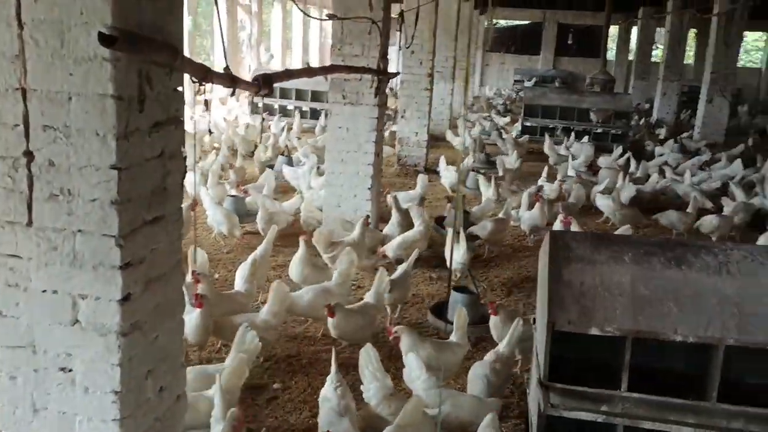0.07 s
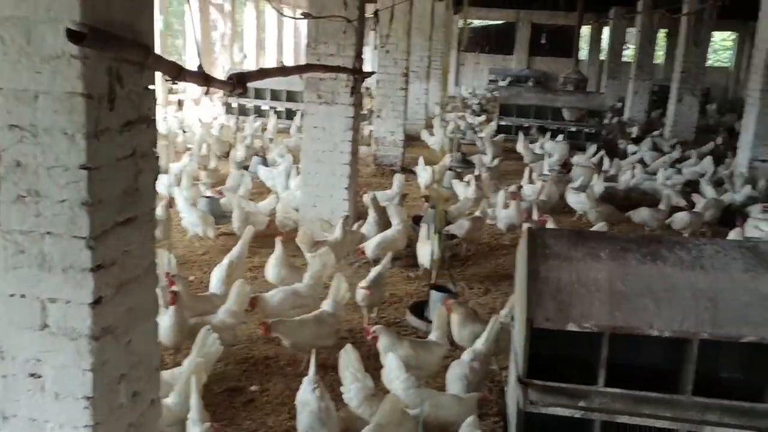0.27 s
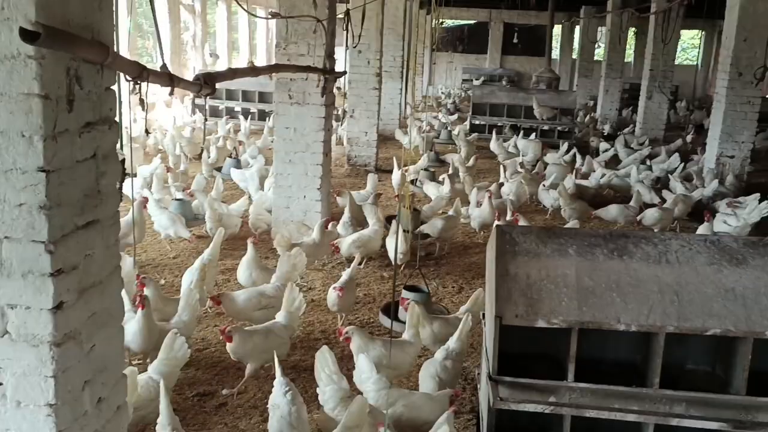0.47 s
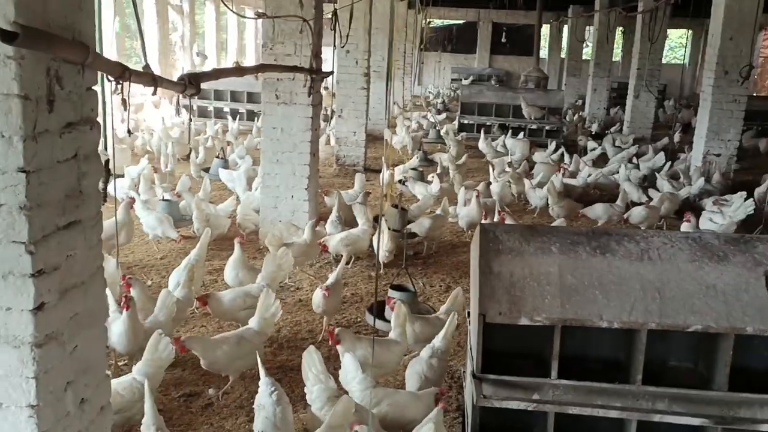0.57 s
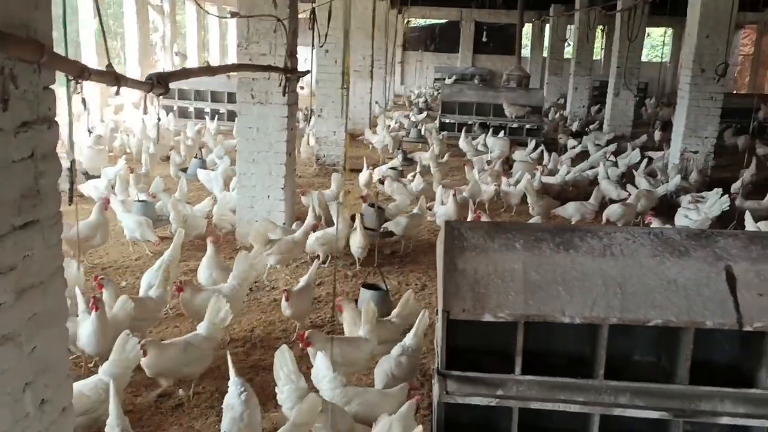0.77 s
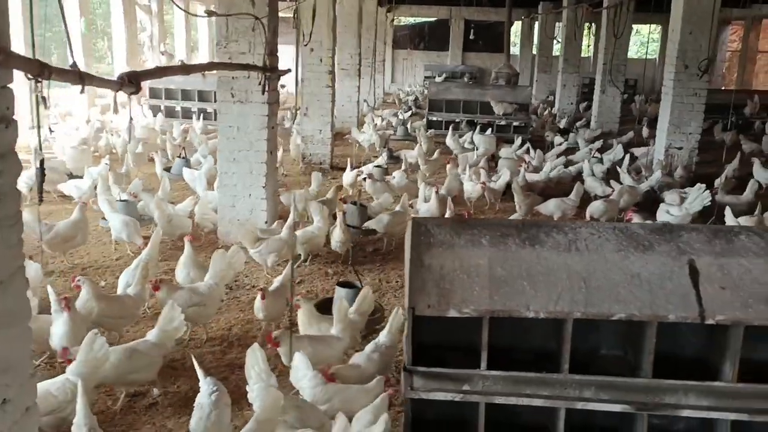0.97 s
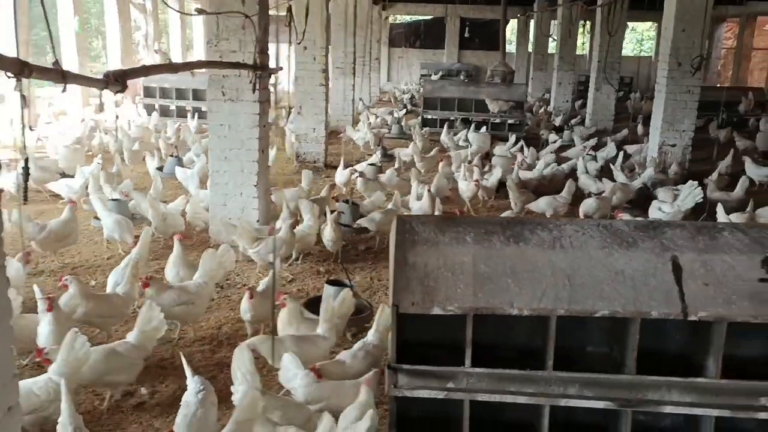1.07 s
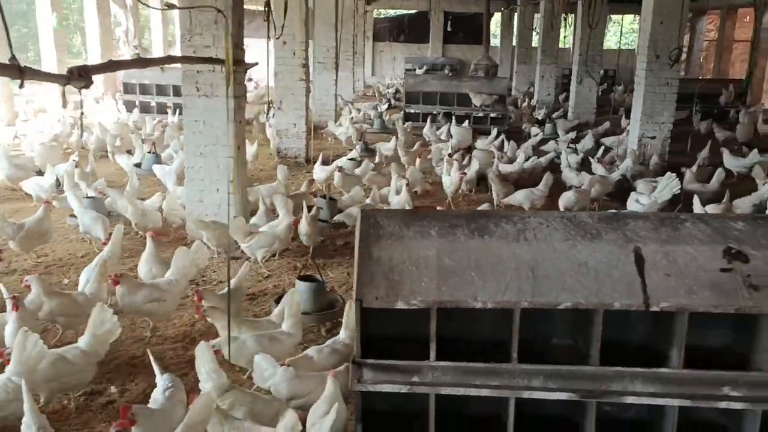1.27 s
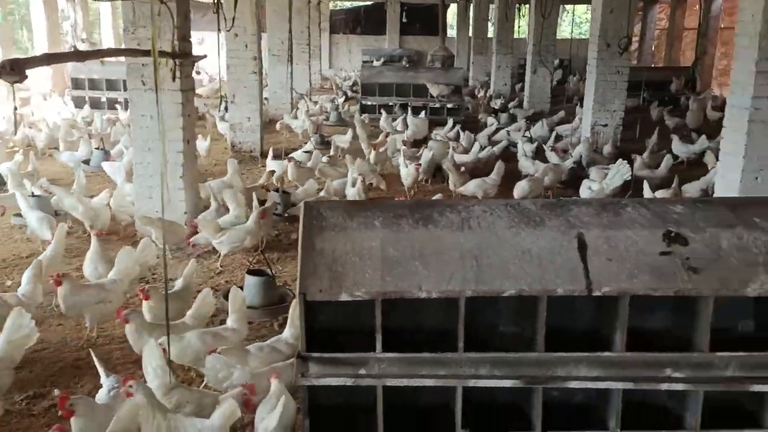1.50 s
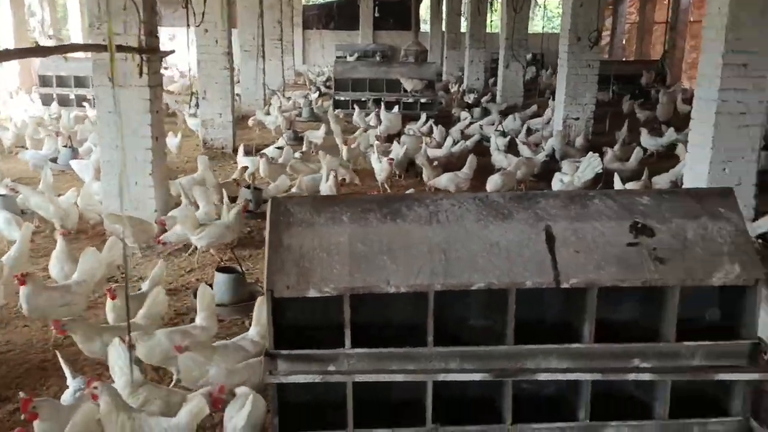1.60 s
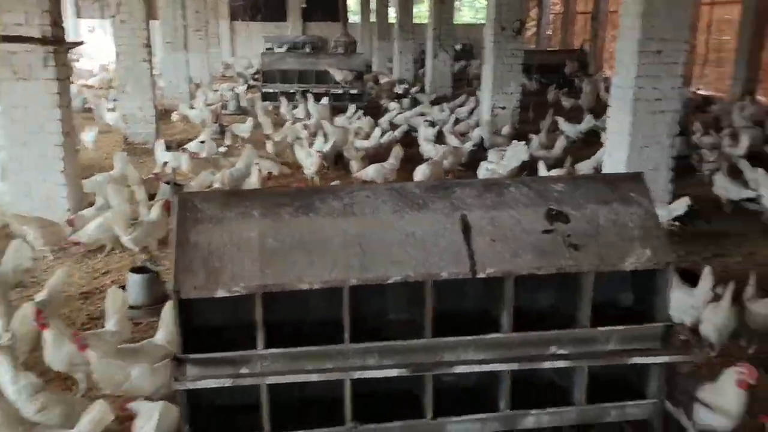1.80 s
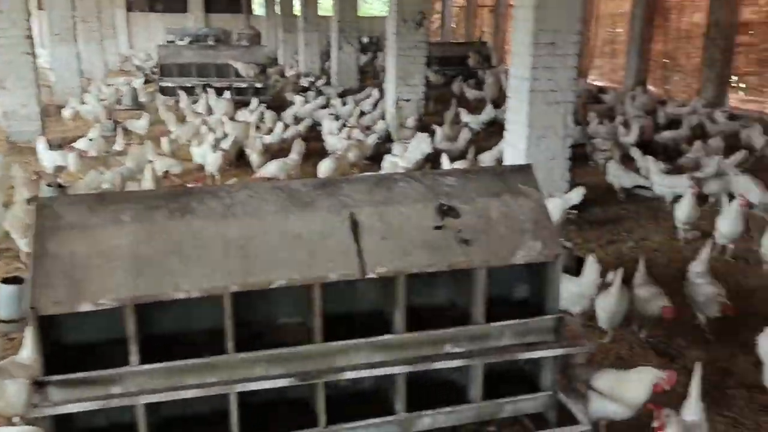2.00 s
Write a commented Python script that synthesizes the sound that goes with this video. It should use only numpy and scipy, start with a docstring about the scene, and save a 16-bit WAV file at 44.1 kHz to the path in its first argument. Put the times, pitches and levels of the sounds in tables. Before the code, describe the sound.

Hens cluck softly throughout, with a short echo from the farm shed. Early on, a nearby hen shrieks and squawks harshly; then more distant birds make long rasping calls while a few brief clucks sound near the microphone.

```python
"""A murmuring flock of hens, and close to the microphones one hen shrieks, then breaks into a squawk.
Long rasping growls follow from farther back, among short clucks and thin calls. The shriek is almost
a pure tone; the squawk and calls are harmonics and breath shaped by a throat; the growls are slow
snaps that ring it. Heard on a stereo pair in an open brick shed, which gives the voices a short tail."""
import sys
import numpy as np
from scipy import signal
from scipy.fft import rfft, irfft, next_fast_len
from scipy.io import wavfile

SR = 44100
rng = np.random.default_rng(int(sys.argv[2]) if len(sys.argv) > 2 else 0)


def dump(signal):
    """Clip the signal to [-1, 1] and save it as 16-bit WAV at the path in sys.argv[1]."""
    limited = np.clip(np.atleast_2d(signal).T, -1, 1)
    pcm = np.round(limited * 32767).astype(np.int16)
    wavfile.write(sys.argv[1], SR, pcm)


N = 90404

# The near hen's shriek. Each row: time in seconds, pitch in Hz, level in dB.
SHRIEK_PATH = [(.229, 1340, -45), (.236, 1392, -20), (.256, 1415, -21.5), (.298, 1502, -16.5),
               (.342, 1478, -19.5), (.362, 1398, -21.5), (.385, 1240, -37)]
# Its partials. Each row: multiple of the pitch, level in dB.
SHRIEK_HARMONICS = [(1, 0), (2, -23), (3, -24), (4, -30), (6, -47)]
# Her squawk. Each row: time in seconds, pitch in Hz, level in dB, roughness from 0 to 1,
# gain of the half-pitch lines in dB.
SQUAWK_PATH = [(.378, 590, -30, .3, -30), (.396, 560, -24, .15, -25), (.412, 615, -16, .15, -14),
               (.446, 595, -21, .35, -14), (.47, 590, -21, .65, -3), (.51, 550, -20.5, .55, 2),
               (.578, 536, -23, .22, 5), (.615, 552, -25.5, .06, 2), (.647, 597, -18, .02, -6),
               (.708, 570, -21, .06, -24), (.745, 520, -33, .4, -13)]
# Her throat. Each row: frequency in Hz, gain in dB.
SQUAWK_THROAT = [(300, -39), (580, -17), (850, -11), (1200, 4), (1400, 2.5), (1650, -8.5), (2200, -6),
                 (2850, -11), (3400, -20.5), (4130, -14), (4720, -23), (5400, -38.5), (6800, -38),
                 (8000, -34.5), (11000, -47.5), (15500, -75)]
# The flat hiss that ends her squawk. Each row: frequency in Hz, gain in dB.
HISS_SPECTRUM = [(3000, 0), (15000, 0)]
# Growls, farther back. Each row: start and length in seconds, relative level in dB, rise and fall
# in seconds, factor on the throat's frequencies, lag at the left microphone in samples.
FAR_GROWLS = [(-.1, 0.19, -35, .03, 0.12, 0.9, 7.3), (0.788, 0.31, -31, 0.072, 0.026, 0.95, 19),
              (1.072, 0.3, -33, 0.0072, 0.13, 0.95, 19), (1.43, 0.33, -31.5, 0.0029, 0.011, 0.99, 10.5)]
# A growling throat. Each row: frequency in Hz, gain in dB.
GROWL_FORMANTS = [(500, -53), (730, -4.5), (890, -5.5), (1030, -9), (1280, 3), (1480, 0), (1750, -14.5),
                  (2500, -14), (3600, -14.5), (4400, -27), (5400, -29.5), (6400, -57), (8000, -31),
                  (11300, -52.5), (15500, -61.5)]
# Clucks close by. Each row: start and length in seconds, pitch in Hz, level in dB,
# roughness from 0 to 1, left over right in dB.
NEAR_CLUCKS = [(-.03, 0.061, 565, -32, 0.2, -1.5), (0.98, 0.041, 594, -25.5, 0.61, 2.5),
               (1.016, 0.031, 599.7, -25, 0.25, 7.5), (1.756, 0.032, 495.2, -25, 0.4, 2.5),
               (2.02, 0.073, 612, -38.5, 0.1, -3)]
# A clucking throat. Each row: frequency in Hz, gain in dB.
CLUCK_FORMANTS = [(300, -43), (570, -2), (1000, 13), (1300, 4.5), (1850, 10), (2500, -4), (3500, -10),
                  (4400, -13), (6300, -31.5), (8200, -38), (15500, -71.5)]
# Pops of a voice close by. Each row: start in seconds, level in dB.
NEAR_POPS = [(1.439, -22), (1.977, -27.5)]
# Thin calls from far off. Each row: start and length in seconds, pitch in Hz, relative level in dB.
THIN_CALLS = [(0.148, 0.13, 442, -42.5), (.785, 0.045, 437, -37.5), (1.038, 0.384, 662.3, -39),
              (1.35, 0.098, 441, -38), (1.455, 0.286, 439.9, -35.5), (1.545, 0.1, 401, -39.5),
              (1.955, 0.12, 642.7, -46.5)]
# Those callers' throats. Each row: frequency in Hz, gain in dB.
THIN_FORMANTS = [(480, -46.5), (660, -22.5), (880, 27), (1050, -1.5), (1320, -2.5), (1750, -26),
                 (2600, -36), (3650, -12), (4600, -28.5), (6000, -46), (15000, -84)]
# The colour of the flock's murmur. Each row: frequency in Hz, gain in dB.
MURMUR_SPECTRUM = [(500, -34.5), (720, -19.5), (900, 1), (1050, -17), (1310, 2.5), (1480, -7), (1750, -31),
                   (2700, -34), (3800, -29), (4600, -54), (6200, -57), (8000, -42), (11000, -56),
                   (15500, -84.5)]
# Its rise and fall. Each row: time in seconds, level in dB.
MURMUR_LEVEL = [(0, -28), (0.126, -45), (0.222, -28.5), (0.499, -27), (0.778, -31.5), (1.37, -36.5),
                (1.6, -36.5), (2.05, -36)]
# Soft bumps on the left, perhaps hens jostling. Each row: start in seconds, level in dB.
LEFT_BUMPS = [(0.589, -52.5), (1.407, -57), (1.979, -58.5)]
# Their dull body. Each row: frequency in Hz, gain in dB.
BUMP_SPECTRUM = [(110, -31), (200, -9.5), (320, -0.5), (470, -16.5), (1200, -56.5)]
# Low rumble and shuffling in the shed. Each row: frequency in Hz, gain in dB.
RUMBLE_SPECTRUM = [(25, -46), (52, -14), (65, -10.5), (83, -1.5), (105, -20), (300, -9.5), (480, -23),
                   (900, -62.5)]
# The ring of the shed. Each row: frequency in Hz, seconds for the tail to fall 60 dB.
SHED_DECAY = [(200, 0.095), (1200, 0.28), (4000, 0.17), (12000, 0.077)]
# The mismatch of the microphones. Each row: frequency in Hz, left over right in dB.
PAIR_BALANCE = [(700, 0), (1300, 0.5), (2400, 4.5), (4400, 1.5), (8000, -1.5), (14000, 19)]

BAND_LIMIT_HZ = 15700
NEAR_LOW_CUT_HZ, FAR_LOW_CUT_HZ = 507, 645  # the voices, near and far, are cut steeply below these


def shriek(jitter=0.0057, flutter_db=5.0, ring_hz=4480, ring_width_hz=80, ring_db=10):
    """A nearly pure high note arches and drops; one overtone swells as it crosses a resonance."""
    hz, db = controls(SHRIEK_PATH)
    n = len(hz)
    phase = 2 * np.pi * np.cumsum(hz * (1 + jitter * wander(n, 700))) / SR
    tone = np.zeros(n)
    for k, partial_db in SHRIEK_HARMONICS:
        resonance = ring_db / (1 + ((k * hz - ring_hz) / ring_width_hz) ** 2)
        flutter = flutter_db * (k > 1) * wander(n, 67)
        tone += amp(partial_db + resonance + flutter) * np.sin(k * phase)
    breath = amp(-15.5) * colour(rng.standard_normal(n), SQUAWK_THROAT)
    return amp(db) * (evened(tone) + breath)


def squawk(rattle_db=4, rattle_hz=220):
    """The near hen's voice breaks down into a rasp, doubles its period, then clears."""
    hz, db, rough, half_db = controls(SQUAWK_PATH)
    rattle = rattle_db * rough * wander(len(hz), rattle_hz)
    envelope = amp(db + rattle) * signal.windows.tukey(len(hz), .05)
    return envelope * voice(hz, rough, SQUAWK_THROAT, half_db, jitter=0.0042)


def voice(hz, rough, throat, half_db=-60, jitter=.005, count=48):
    """Wavering harmonics, half-pitch lines and a puff of air per cycle pass through a throat."""
    n, block = len(hz), 64
    waver = (jitter + .06 * rough) * wander(n, 259.08)
    phase = 2 * np.pi * np.cumsum(hz * (1 + waver)) / SR
    phase += np.pi * .008 * wander(n, 1500)  # uneven cycles blur the top harmonics
    k = np.arange(1, count + 1)[:, None]  # even k: harmonics; odd k: half-pitch lines
    line_hz = k * hz[::block] / 2
    line_db = read(throat, line_hz) + (k % 2) * (half_db * np.ones(n))[::block]
    gains = np.repeat(amp(line_db) * (line_hz < BAND_LIMIT_HZ), block, axis=1)[:, :n]
    tone = (gains * np.cos(k * phase / 2 + rng.uniform(0, np.pi, (count, 1)))).sum(0)
    air = colour((1 + np.cos(phase)) * rng.standard_normal(n), throat)
    return ((1 - rough) * evened(tone) + rough * air) / np.hypot(1 - rough, rough)


def growl(length, db, rise, fall, formant_scale, snaps_per_s=94, puff_s=0.0049):
    """Slow uneven snaps, each with a puff of air, ring the throat."""
    t = np.arange(0, length, 1 / SR)
    cycles = np.cumsum(snaps_per_s * np.exp(.35 * wander(len(t), 120))) / SR
    snaps = np.diff(np.floor(cycles), prepend=0)
    puffs = 0.23 + np.exp(-(cycles % 1) / snaps_per_s / puff_s)
    air = puffs * amp(3 * wander(len(t), 85.36)) * rng.standard_normal(len(t))
    envelope = np.clip(np.minimum(t / rise, (length - t) / fall), 0, 1)
    rasp = colour(evened(air) + 0.59 * evened(snaps), GROWL_FORMANTS, formant_scale)
    return amp(db) * envelope * rasp


def call(length, hz, db, rough, throat, arch=0.032, count=48, fade_s=0.012):
    """A cluck or a longer call: one voiced note with a small arch of pitch."""
    t = np.arange(0, length, 1 / SR)
    pitch = hz * (1 + arch * (np.sin(np.pi * t / length) - 2 / np.pi))
    envelope = np.clip(np.minimum(t, length - t) / fade_s, 0, 1)
    return amp(db) * envelope * voice(pitch, rough, throat, count=count)


def pop(db, hz=1324, length_s=0.0154):
    """One puff rings the main resonance of a throat."""
    t = np.arange(0, length_s, 1 / SR)
    return amp(db) * np.sin(np.pi * t / length_s) ** 2 * np.sin(2 * np.pi * hz * t)


def flock(calls_per_s=45, spread_db=3, blur_db=-5):
    """Many distant hens call at random, left and right, over the blur of the rest."""
    calls = np.zeros((2, N))
    for i, (when, length, pitch, loud, side) in enumerate(rng.random((128, 5))):
        start = (i + when) / calls_per_s - .1
        if start < N / SR:
            note = call(0.038 + 0.1457 * length, 300 + 380 * pitch, spread_db * (2 * loud - 1),
                        rough=0.11, throat=MURMUR_SPECTRUM, count=28)
            add(calls, start, place(note, side_db=7 * (2 * side - 1)))
    blur = np.array([colour(noise, MURMUR_SPECTRUM) for noise in rng.standard_normal((2, N))])
    blur = blur + 0.36 * blur[::-1]  # each microphone hears some of the other side
    level = amp(np.interp(np.arange(N) / SR, *np.transpose(MURMUR_LEVEL)))
    echoing_calls = evened(calls + 1.51 * shed(calls))
    return level * evened(echoing_calls + amp(blur_db) * blur)


def swell(db, rise_s, spectrum):
    """A hiss or a soft bump: coloured noise rises and dies away."""
    age = np.arange(0, 10 * rise_s, 1 / SR) / rise_s
    return amp(db) * age * np.exp(1 - age) * colour(rng.standard_normal(len(age)), spectrum)


def rumble():
    """Faint low noise in the shed, part of it common to both microphones."""
    common, left, right = [colour(noise, RUMBLE_SPECTRUM) for noise in rng.standard_normal((3, N))]
    return amp(-65) * (place(common, side_db=5.5) + np.array([left, right]))


def shed(x, reflections_per_s=2500):
    """Sparse reflections of random sign come off the brick, each band dying at its own speed."""
    taps = rng.choice([-1., 1.], (2, SR // 2)) * (rng.random((2, SR // 2)) < reflections_per_s / SR)
    taps[:, :130] = 0  # about 3 ms before the first reflection
    hz, t, bands = signal.stft(taps, SR, nperseg=256)
    decay = amp(-60 * t / read(SHED_DECAY, hz)[:, None])
    early_lift = 1 + 3.2 * np.exp(-t / 0.052)
    tail = signal.istft(bands * decay * early_lift, SR, nperseg=256)[1]
    tail /= np.linalg.norm(tail, axis=1, keepdims=True)
    return signal.fftconvolve(x, tail, axes=1)[:, :N]


def brighten(x, db_per_octave=7.5):
    """Treble reaches the microphones mostly by way of the walls: a tilt from 1.5 to 6 kHz."""
    octaves = np.log2(np.clip(np.fft.rfftfreq(N, 1 / SR) / 1500, 1, 4))
    return irfft(rfft(x) * amp(db_per_octave * octaves), N)


def amp(db):
    """Decibels to gain."""
    return 10 ** (np.asarray(db) / 20)


def evened(x):
    """Scales to an rms of one."""
    return x / np.sqrt(np.mean(x ** 2) + 1e-20)


def read(points, hz):
    """Reads a curve on a log-frequency axis."""
    f, value = np.transpose(points)
    return np.interp(np.log(hz + 1), np.log(f + 1), value)


def controls(table):
    """One curve for each column after the time, from the first row to the last."""
    times, *columns = np.transpose(table)
    t = np.arange(times[0], times[-1], 1 / SR)
    return [np.interp(t, times, column) for column in columns]


def colour(x, spectrum, scale=1):
    """Filters by a spectrum, its frequencies times scale; the result has an rms of one."""
    n = next_fast_len(len(x) + 2048)
    gain = amp(read(spectrum, np.fft.rfftfreq(n, 1 / SR) / scale))
    return evened(irfft(rfft(x, n) * gain, n)[:len(x)])


def wander(n, rate_hz):
    """Smooth random motion."""
    return np.interp(np.arange(n) * rate_hz / SR, np.arange(4096), rng.standard_normal(4096))


def low_cut(x, hz):
    """A steep high-pass."""
    return signal.sosfilt(signal.butter(6, hz, "high", fs=SR, output="sos"), x)


def place(x, side_db=0, lag=0):
    """Onto the pair: the left microphone is side_db louder and lag samples later."""
    samples = np.arange(len(x))
    left = np.interp(samples - lag, samples, x)
    return np.array([left * amp(side_db / 2), x * amp(-side_db / 2)])


def add(mix, start_s, sound):
    """Mixes a stereo sound in, trimming what falls outside."""
    at = round(start_s * SR)
    sound = sound[:, max(-at, 0):]
    part = mix[:, max(at, 0):][:, :sound.shape[1]]
    part += sound[:, :part.shape[1]]


def scene():
    """Near hens, farther hens and the flock under one roof."""
    near, far, bumps = np.zeros((3, 2, N))
    add(near, SHRIEK_PATH[0][0], place(shriek(), lag=6))
    add(near, SQUAWK_PATH[0][0], place(squawk(), lag=7))
    for start, *row, lag in FAR_GROWLS:
        add(far, start, place(growl(*row), lag=lag))
    for start, *row, side_db in NEAR_CLUCKS:
        add(near, start, place(call(*row, CLUCK_FORMANTS), side_db, lag=13.1))
    for start, *row in THIN_CALLS:
        add(far, start, place(call(*row, rough=0.18, throat=THIN_FORMANTS, arch=0.012)))
    add(near, .704, place(swell(db=-53, rise_s=0.0078, spectrum=HISS_SPECTRUM)))
    for start, db in NEAR_POPS:
        add(near, start, place(pop(db)))
    for start, db in LEFT_BUMPS:
        add(bumps, start, place(swell(db, rise_s=0.033, spectrum=BUMP_SPECTRUM), side_db=16.5))
    near = low_cut(near, NEAR_LOW_CUT_HZ)
    distant = low_cut(amp(-3) * far + amp(-2) * shed(far) + flock(), FAR_LOW_CUT_HZ)
    near_echo = shed(amp(-13) * brighten(near))
    return near + near_echo + distant + bumps + rumble()


def record(dry):
    """The two microphones differ in colour, and the top of the band is cut off."""
    balance_db = read(PAIR_BALANCE, np.fft.rfftfreq(2 * N, 1 / SR))
    heard = irfft(rfft(dry, 2 * N) * amp([balance_db / 2, -balance_db / 2]), 2 * N)[:, :N]
    low_pass = signal.firwin(511, BAND_LIMIT_HZ, window=("kaiser", 9), fs=SR)
    return signal.oaconvolve(heard, low_pass[None], "same")


dry = scene()
out = record(dry)
dump(out)
```